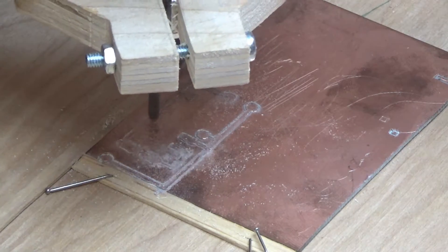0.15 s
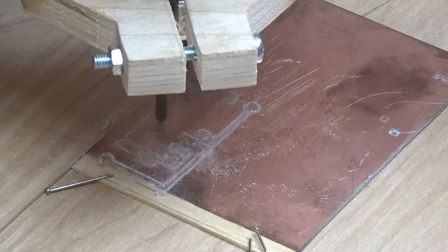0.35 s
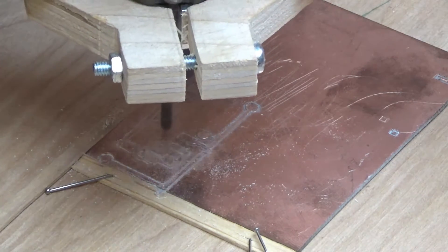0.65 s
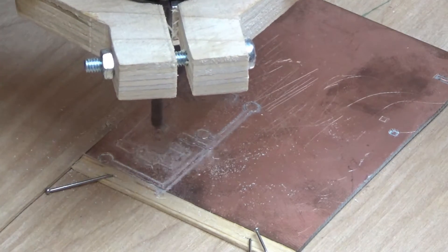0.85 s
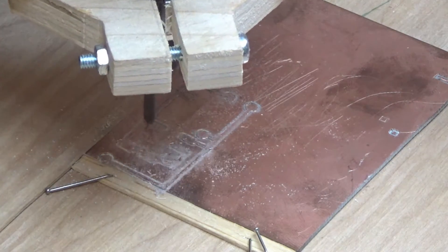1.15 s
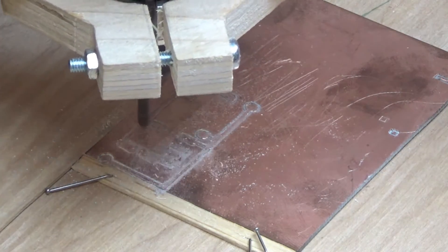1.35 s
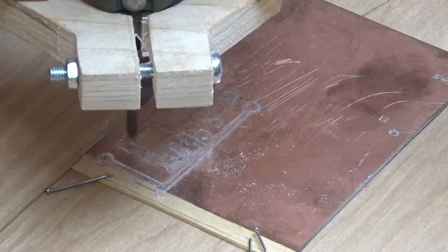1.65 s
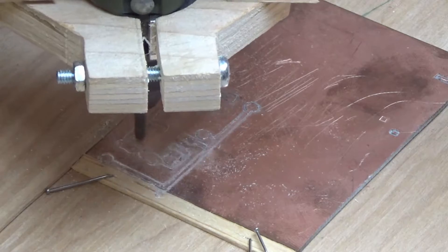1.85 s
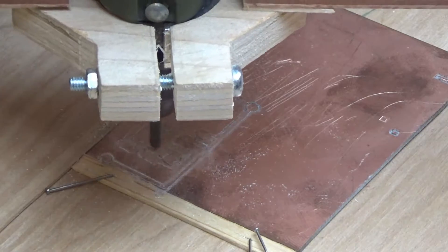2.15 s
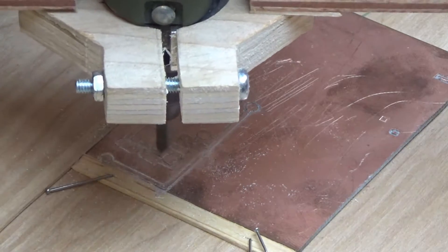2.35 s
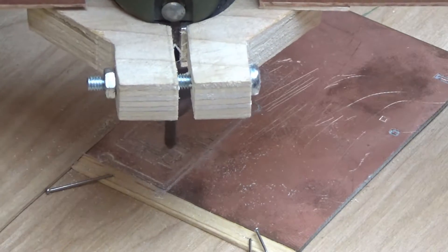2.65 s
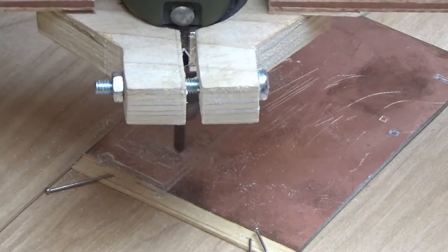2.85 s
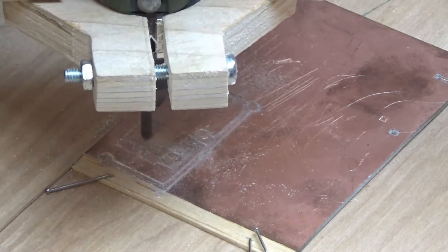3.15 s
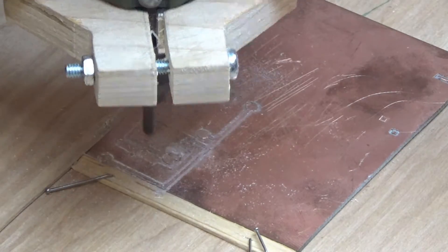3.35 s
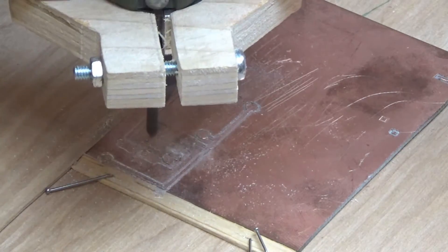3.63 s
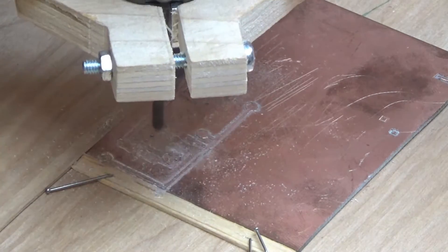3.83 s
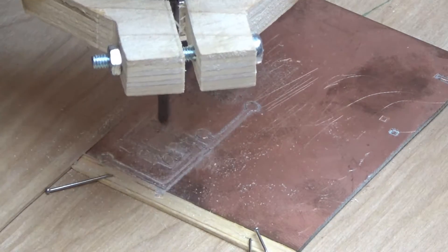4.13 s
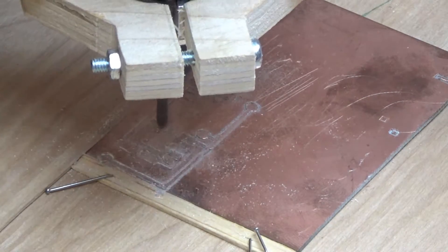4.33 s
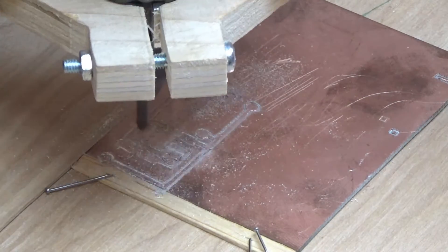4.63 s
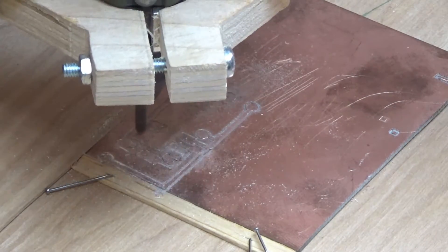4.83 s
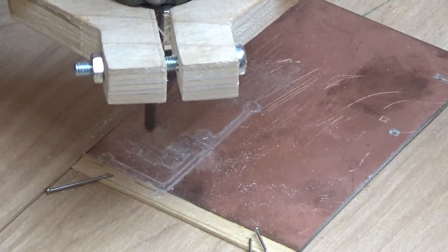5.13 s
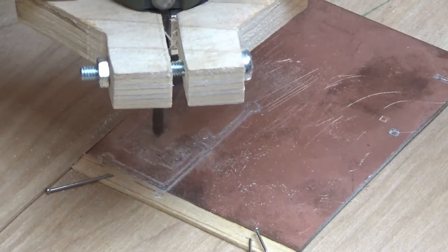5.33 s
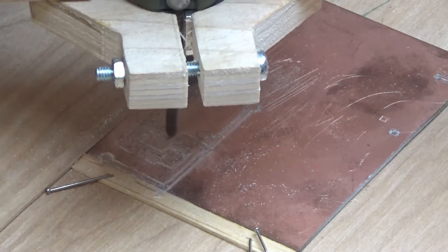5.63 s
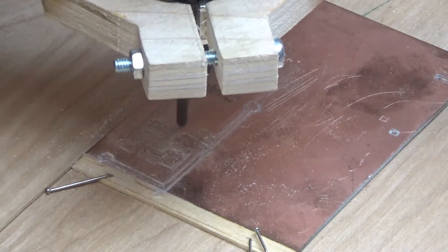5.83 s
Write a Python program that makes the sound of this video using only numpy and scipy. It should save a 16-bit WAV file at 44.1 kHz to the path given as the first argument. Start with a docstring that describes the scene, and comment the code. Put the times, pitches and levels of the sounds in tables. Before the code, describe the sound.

A small rotary tool engraves a copper board, close and dry, in stereo with treble leaning slightly left. From 0 to about 2.6 s the bit is already cutting: a piercing, buzzy whine near 1.8 kHz with strong overtones, strongest around 5.4 kHz, trembling and shifting in shrillness, mixed with fine gritty scraping. A momentary break at 2.6 s is followed by a fresh bite until 2.95 s. Then short bites at roughly 3.2-3.4, 3.6-3.7, 3.9-4.1 and 4.25-4.45 s alternate with gaps where the whine collapses to a thin, rapid metallic rattle and hiss; many lifts give a tiny chirp. Each bite enters accented, its pitch sagging slightly. From 4.8 s the whine holds steadily to the end at 6 s. Underneath are constant motor hum near 500 Hz, high commutator tones, airy fan hiss, and faint wooden rumble with soft bumps, mostly around 1-1.7, 2.5-2.8 and 3.2 s.

```python
"""A spindle chatters in a bright whine: a small rotary tool in a wooden clamp engraves a copper-clad board, close up.
The whine is a stack of sine partials whose pitch sags as the bit bites; near each lift it chirps and collapses.
What remains is a thin rattle: tones and puffs of hiss locked to every third turn of the shaft.
Behind it are an almost steady motor hum with commutator tones, the hiss of fan and brushes (shaped noise),
the scrape of the cutting edges (grainy noise), and low rumbles and bumps of the wooden rig."""
import sys
import numpy as np
from scipy import signal
from scipy.fft import rfft, irfft
from scipy.io import wavfile
from scipy.ndimage import uniform_filter1d

SR = 44100
rng = np.random.default_rng(int(sys.argv[2]) if len(sys.argv) > 2 else 0)


def to_wav(sig):
    """Store sig (one row per channel, or 1-D mono) as 16-bit WAV at the path in sys.argv[1].

    Samples outside -1..1 are clipped; the rate is SR.
    """
    pcm = np.clip(np.atleast_2d(sig), -1, 1) * 32767
    pcm = np.round(pcm).astype(np.int16)
    wavfile.write(sys.argv[1], SR, pcm.T)  # frames by channels


N = 263718  # length [samples]
MOTOR_HZ = 498.9  # average turns of the shaft per second
TOP_HZ = 15720  # upper edge of the sound

# colour of the hiss of fan and brushes: (frequency [Hz], density [dB per Hz])
FAN_HISS = [(30, -140), (130, -128), (330, -129), (750, -125), (1300, -117), (2400, -105.5), (3800, -103.5),
            (4500, -106), (5600, -103), (9400, -101), (10500, -105), (11700, -103), (14200, -109),
            (15600, -108)]
# the bit touches the copper, catches and slips out again:
# (touch [s], catch [s], lift [s], flare of the third partial at the slip [dB])
BIT_STROKES = [(-0.5, -0.4, 2.576, 0), (2.58, 2.625, 2.956, 6), (3.14, 3.205, 3.366, 5),
               (3.514, 3.568, 3.724, 6), (3.878, 3.918, 4.068, 0), (4.2, 4.263, 4.436, 6),
               (4.728, 4.797, 6.3, 0)]


def undb(db):
    """Turn decibels into a gain."""
    return 10 ** (np.asarray(db) / 20)


def curves(table):
    """Draw each column of a time table as a curve, sample by sample."""
    s, *columns = np.transpose(table)
    t = np.arange(N) / SR
    return [np.interp(t, s, column) for column in columns]


def walk(rate):
    """Wander smoothly and at random around 0 with a spread near 1; a higher rate [Hz] is faster."""
    k = max(int(SR / rate), 1)
    steps = np.repeat(rng.standard_normal(N // k + 1), k)
    smooth = uniform_filter1d(uniform_filter1d(steps, k), k)
    return 1.25 * smooth[:N]


def shape(points):
    """Spread a (frequency [Hz], value) table over the frequency bins, on a logarithmic scale."""
    hz, value = np.transpose(points)
    bin_hz = np.arange(N // 2 + 1) * SR / N
    return np.interp(np.log(bin_hz + 1), np.log(hz), value)


def noise(points, apart_hz=13000, apart_max=0.25):
    """Make stereo noise of a given density; left and right differ more and more towards the treble."""
    mid, side = rfft(rng.standard_normal((2, N))) * undb(shape(points)) * np.sqrt(SR / 2)
    bin_hz = np.arange(N // 2 + 1) * SR / N
    apart = apart_max * np.minimum(bin_hz / apart_hz, 1) ** 2
    return irfft(mid + np.array([[1], [-1]]) * apart * side, N)


def turning(hz):
    """Add up the phase [radians] of a rotation, from a random start."""
    return 2 * np.pi * (np.cumsum(hz) / SR + rng.random())


def tone(phase, db):
    """Make a sine of the given rms level."""
    return np.sqrt(2) * undb(db) * np.sin(phase)


def partial(whirl, db, order):
    """Make one partial: a whole multiple of the chatter, from a random phase."""
    return tone(order * whirl + 2 * np.pi * rng.random(), db)


def bench(contact, rumble_db=-8, loose_db=4, uneven_db=5.5, bump_s=0.076):
    """The wooden rig rumbles, more when the bit does not steady it, and bumps as it is guided over the board."""
    # colour of the rumble before its level is set: (frequency [Hz], density [dB per Hz])
    rumble = [(30, -138), (75, -130), (125, -116), (165, -121), (230, -118), (330, -131), (700, -142)]
    # soft bumps of the rig: (time [s], rise [dB])
    bumps = [(1.02, 9), (1.29, 16), (1.42, 11), (1.72, 6), (2.47, 12), (2.78, 8), (3.16, 4), (3.28, 10)]
    t = np.arange(N) / SR
    bumps_db = sum(db * np.exp(-((t - s) / bump_s) ** 2) for s, db in bumps)
    level_db = rumble_db + loose_db * (1 - contact) + bumps_db + uneven_db * walk(20)
    return noise(rumble) * undb(level_db)


def motor(shaft, hum_db=1.16, flutter_db=-2.5, smear=0.2, gust_db=0.5):
    """The turning shaft hums and its commutator adds higher tones, over the hiss of fan and brushes."""
    # hum before trim and wander: (time [s], shaft tone level [dB], its octave level [dB])
    hum_levels = [(0, -92, -98), (.28, -99, -90.5), (.7, -91.5, -92.5), (1.33, -86, -90.5),
                  (2.1, -97, -93.5), (2.5, -96.5, -87), (4.85, -94, -88.5), (5.38, -97, -90.5),
                  (5.98, -90, -81.5)]
    # commutator tones, around which the level flutters: (multiple of the shaft rate, level [dB])
    commutator = [(7, -83), (13, -87.5), (17, -88), (19, -73), (26, -78)]
    hum = sum(tone((k + 1) * shaft, db + hum_db + walk(11)) for k, db in enumerate(curves(hum_levels)))
    # smear [radians] blurs each tone a little
    tones = sum(tone(round(k) * shaft + smear * walk(27), db + flutter_db * walk(6)) for k, db in commutator)
    hiss = noise(FAN_HISS) * undb(gust_db * walk(15))
    return hum + tones + hiss


def scraping(contact, growth=0.93, grain_db=1, surge_db=0.5):
    """The cutting edges tear off copper and resin dust in fine grains and small surges."""
    # colour of the scrape before its level is set: (frequency [Hz], density [dB per Hz])
    scrape_colour = [(300, -130), (700, -122), (900, -113), (1200, -116), (1550, -104), (2000, -122),
                     (4400, -111), (5200, -95.5), (6000, -100), (7200, -104), (8500, -99), (10000, -105),
                     (13200, -105), (15600, -113)]
    # how hard the cutting edges scrape: (time [s], level [dB])
    effort_table = [(0.01, 1), (0.28, 2.7), (0.81, 0.4), (1.26, 2.3), (2.38, 1.7), (2.45, -1.5),
                    (3.29, 1.6), (5.06, 0.7), (5.11, 3.5), (5.96, -1.3)]
    effort_db, = curves(effort_table)
    level_db = effort_db + grain_db * walk(500) + surge_db * walk(35)
    return noise(scrape_colour) * contact ** growth * undb(level_db)


def rattle(shaft, contact, rattle_db=0, flutter_db=2, swell_db=1.0, tick_db=-4):
    """Unloaded, the loose spindle repeats its knocks every third turn, each with a puff of hiss."""
    # tones of the free spindle before flutter and contact: (frequency [Hz], level [dB])
    spindle_tones = [(1830, -87), (2331, -85.5), (3160, -82.5), (3327, -75), (3494, -79.5), (3661, -80.5),
                     (3828, -74), (3993, -78.5), (4160, -87.5), (4326, -84.5), (4823, -84), (4990, -77),
                     (5152, -78), (5324, -82), (5486, -68), (5658, -70.5), (5820, -74.5), (5992, -76),
                     (6148, -83.5), (6320, -77.5), (6988, -93.5), (7149, -70.5), (7483, -73), (7650, -79),
                     (7784, -79.5), (8990, -86.5), (9157, -67.5), (9308, -72), (9475, -77), (9641, -74),
                     (11445, -75), (12823, -83.5)]
    cycle = shaft / 3
    step_hz = MOTOR_HZ / 3
    lines = 0
    for hz, db in spindle_tones:
        # no two knocks land quite alike, which roughens every tone
        scatter = 2 * np.pi * rng.random() + .35 * walk(40) + .3 * walk(step_hz)
        # each tone snaps to a whole multiple of the knocking rate
        lines += tone(round(hz / step_hz) * cycle + scatter, db + flutter_db * walk(14))
    since_knock = cycle / (2 * np.pi) % 1  # share of the cycle
    puffs = np.exp(-since_knock / 0.33) * noise(FAN_HISS)
    knocking = lines * undb(rattle_db + swell_db * walk(9)) + undb(tick_db) * puffs
    return (1 - contact) ** 2 * knocking


def strokes():
    """The bit grazes, snaps in and leaves quickly: give its depth (0-1) and each fresh bite's accent [dB]."""
    release_s = 0.005  # the hold fades by this time constant after a lift
    fresh_peak_db, fresh_s = 4.5, 0.046  # a fresh bite is louder, then settles by this time constant
    graze_share, catch_s = 0.6, 0.0087  # depth reached by grazing, and the time to snap in
    t = np.arange(N) / SR
    bite, fresh_db = 0, 0
    for touch, catch, lift, _ in BIT_STROKES:
        grazing = np.clip((t - touch) / (catch - touch), 0, 1)
        caught = np.clip((t - catch) / catch_s, 0, 1)
        held = np.exp(-np.maximum(t - lift, 0) / release_s)
        bite = bite + held * (graze_share * grazing + (1 - graze_share) * caught)
        settling = np.exp(-np.maximum(t - catch, 0) / fresh_s)
        fresh_db = fresh_db + fresh_peak_db * held * caught * settling
    return np.clip(bite, 0, 1), fresh_db


def whine(shaft, hz, sag_hz, contact, fresh_db, slip_hz=19, slip_s=0.005, tremble_db=1.21, stutter_db=7,
          wander_db=3, flutter_db=3, heavy_sag_hz=45, ease_hz=2, lifted_db=-9, sing_db=4, sing_sag_hz=39,
          sing_width_hz=7):
    """The spindle chatters against its bearing; the third partial sits on a resonance of the tool."""
    # main partials: (multiple of the chatter, base level in contact [dB], level of the part that stays
    # when lifted [dB], power of the contact it grows with, change under heavy pressure [dB],
    # share of the fresh bite's accent, wander [dB])
    main_partials = [(1, -62, -82.5, 1.07, -2, 1, 0.92), (2, -63, -84.5, 1.57, 0.5, 0.92, 0.1),
                     (3, -52, -74.5, 0.87, -1, 0.33, 0.62), (4, -58, -82, 1.3, -1, 1.3, 2),
                     (5, -60.5, -79, 1.24, -10.5, 1.4, 3)]
    # high overtones: (multiple of the chatter, share [dB], change under heavy pressure [dB],
    # change per unit of light touch, which is at most 0.25 [dB])
    overtones = [(6, -5.5, 2.5, 38), (7, -1, -6, -22), (8, -6, -6.5, -24)]
    # sum and difference tones: (multiple of the chatter, multiple of the shaft rate,
    # base level in full contact [dB], change under heavy pressure [dB])
    mixes = [(1, 1, -87, 6), (2, 3, -78.5, 5.5), (3, 1, -85.5, 20.5), (4, 1, -84.5, -1), (4, -1, -89, -1),
             (5, 1, -72.5, -3.5), (5, -1, -83, 3), (6, 1, -76, 2.5), (6, -1, -82, 0), (7, 1, -73, 2.5),
             (7, -1, -86, 6.5), (8, -1, -85, 7)]
    # swell of the octave: (time [s], level [dB])
    octave = [(0.01, -0.3), (0.56, -6.5), (0.58, 0.5), (0.76, -3), (0.83, 4), (1.83, -1.5), (2.4, 0.3),
              (2.5, 6), (3.32, -2.5), (4.83, -5), (4.86, 4.5), (5.38, -3.5), (5.41, 1.2), (5.96, 2.5)]
    # swell of the ringing third partial: (time [s], level [dB])
    ring = [(0.01, 6), (0.08, -8.5), (0.21, -1.6), (0.51, -1), (0.63, -5.5), (0.71, 7), (1.03, -0.5),
            (1.13, 6), (1.51, -2.5), (2.25, 2), (2.38, -4.5), (2.65, 1.5), (2.78, -27), (2.83, -7),
            (2.9, -9), (2.93, 5.5), (3.3, -0.4), (3.64, -0.7), (4.87, 0.2), (4.89, -14), (4.92, 0),
            (5.96, 2.0)]
    # shrillness, as the whine flips between two partials: (time [s], fifth minus fourth [dB])
    shrill = [(0.01, -7), (0.21, 16), (0.28, -14), (0.66, 17), (0.68, -4), (0.88, 20), (1.01, -4),
              (1.26, 2), (1.68, 3.5), (1.78, 17), (1.86, -12), (2.23, 8.5), (2.3, -2.1), (2.35, 17),
              (2.43, 7), (4.83, -6.5), (4.88, 13), (5.13, -9), (5.58, 4.5), (5.96, 0)]
    # swell of the high overtones: (time [s], level [dB])
    bright = [(0, 1), (0.6, 2.5), (0.72, 7), (0.82, -8), (1.2, 4.5), (1.6, 1.5), (1.77, 4.5), (2.35, -4.5),
              (2.75, 5.5), (4.85, -4.5), (4.92, -9), (5.15, 0.5), (5.5, 0), (5.7, -6), (5.98, -2)]
    t = np.arange(N) / SR

    # pressure slows the chatter and shifts the balance of its tones; a light touch lets it stutter
    pressed = 1 / (1 + np.exp((heavy_sag_hz - sag_hz) / ease_hz))
    light = contact * (1 - contact)
    unsteady_db = tremble_db + stutter_db * light
    # the fourth and fifth partials share one supply of energy
    shrill_db, = curves(shrill)
    fourth_db = -10 * np.log10(1 + undb(shrill_db) ** 2)
    # the fundamental sings out best at a middling pressure
    singing_db = sing_db * np.exp(-((sag_hz - sing_sag_hz) / sing_width_hz) ** 2)
    swells_db = [singing_db, curves(octave)[0], curves(ring)[0], fourth_db, fourth_db + shrill_db]

    # leaving the groove, the bit skids: a short dip in pitch, centred just before the lift
    for _, _, lift, flare_db in BIT_STROKES:
        slip = np.exp(-((t - lift) / slip_s + 1) ** 2)
        hz = hz - slip_hz * slip
        swells_db[0] = swells_db[0] + flare_db * slip / 2
        swells_db[2] = swells_db[2] + flare_db * slip
    whirl = turning(hz + .9 * walk(60) + 2 * walk(600))

    out = 0
    for (k, db, idle_db, growth, heavy_db, accent, drift_db), swell_db in zip(main_partials, swells_db):
        loaded_db = db + swell_db + heavy_db * pressed + accent * fresh_db
        size = undb(idle_db) + contact ** growth * undb(loaded_db)
        wobble_db = drift_db * walk(22.005) + unsteady_db * walk(85)
        out += size * partial(whirl, wobble_db, order=round(k))

    # the high overtones rise as the pitch sags: -79 dB base, 0.3185 dB per Hz
    upper_db = -79 + 0.3185 * sag_hz + curves(bright)[0] + fresh_db
    for k, db, heavy_db, light_db in overtones:
        share_db = db + heavy_db * pressed + light_db * light + lifted_db * (1 - contact) ** 4
        wobble_db = wander_db * walk(22) + unsteady_db * walk(85)
        out += partial(whirl, upper_db + share_db + wobble_db, order=round(k))

    # the off-centre bit shakes the chatter as the shaft turns
    for k, m, db, heavy_db in mixes:
        level_db = db + heavy_db * pressed + flutter_db * walk(23)
        out += contact * tone(round(k) * whirl + round(m) * shaft, level_db)
    return out


def patchy(sound, depth_db, rate, count=16):
    """Let neighbouring frequency bands swell and fade on their own."""
    edges = np.r_[0, np.geomspace(700, TOP_HZ, count), SR]
    band = np.digitize(np.arange(N // 2 + 1) * SR / N, edges)
    spectrum = rfft(sound)
    return sum(irfft(spectrum * (band == k), N) * undb(depth_db * walk(rate)) for k in np.unique(band))


def ports(sound):
    """Treble reaches the left port of the microphone pair louder and a little later."""
    # (frequency [Hz], left minus right [dB], left lags by [radians])
    port_gaps = [(1800, 0, 0), (3600, .7, .11), (5400, 3.1, .29), (6300, 1.3, .6), (7200, 1.2, 1.0),
                 (9000, 1.4, 1.0), (10700, 2.9, 1.04), (12500, 4.5, 1.29), (14300, 6, 1.55)]
    hz, db, lag = np.transpose(port_gaps)
    # each side takes half of the difference
    ratio = undb(shape(np.c_[hz, db]) / 2) * np.exp(-.5j * shape(np.c_[hz, lag]))
    pair = np.array([ratio, 1 / ratio])
    return irfft(rfft(sound) * pair / abs(pair.mean(axis=0)), N)


def scene():
    """One shaft drives every part of the tool; the deeper the bit bites, the further the chatter sags."""
    # pitch of the chatter with the bit fully in, lower under more pressure: (time [s], frequency [Hz])
    loaded_pitch = [(0.01, 1772.6), (0.11, 1801.3), (0.28, 1787.2), (0.58, 1794.1), (0.61, 1781.2),
                    (0.73, 1780.1), (0.81, 1803.5), (1.03, 1797.3), (1.13, 1808.9), (1.28, 1781.1),
                    (1.66, 1780.5), (1.71, 1790.6), (2.3, 1788.0), (2.38, 1797.7), (2.55, 1788.6),
                    (2.63, 1822.3), (2.83, 1810.0), (2.93, 1819.8), (3.25, 1807.2), (3.96, 1801.2),
                    (4.82, 1808.3), (4.92, 1779.3), (5.39, 1791.3), (5.96, 1785.4)]
    full_sag_hz = 26  # the bit is in full contact once the pitch has sagged this far
    shaft = turning(MOTOR_HZ + .35 * walk(8))
    free_hz = MOTOR_HZ * 11 / 3  # chatter of the unloaded spindle
    bite, fresh_db = strokes()
    sag_hz = bite * (free_hz - curves(loaded_pitch)[0])
    contact = np.clip(sag_hz / full_sag_hz, 0, 1)

    background = patchy(motor(shaft) + scraping(contact), depth_db=1.72, rate=25) + bench(contact)
    spindle = whine(shaft, free_hz - sag_hz, sag_hz, contact, fresh_db) + rattle(shaft, contact)
    return ports(spindle) + background


def record(dry):
    """Cut the treble steeply above the upper edge with an elliptic low-pass filter."""
    low_pass = signal.ellip(12, .1, 80, TOP_HZ, fs=SR, output="sos")
    return signal.sosfilt(low_pass, dry)


dry = scene()
out = record(dry)
to_wav(out)
```